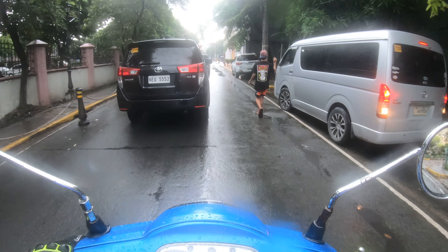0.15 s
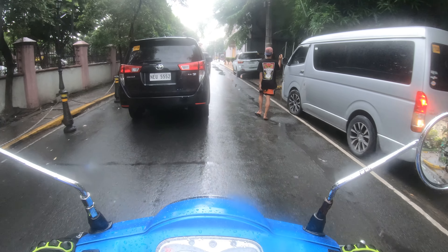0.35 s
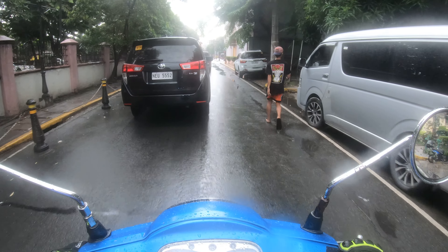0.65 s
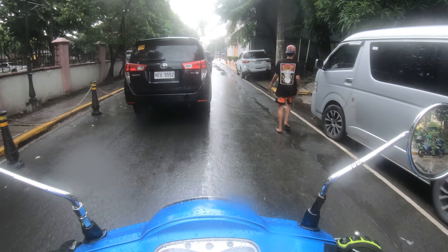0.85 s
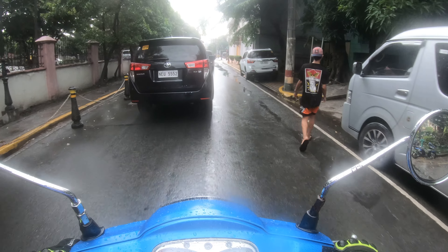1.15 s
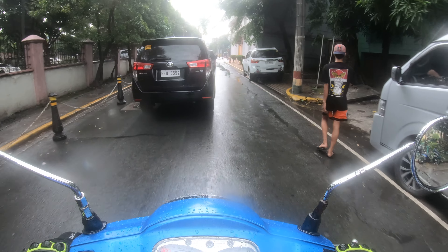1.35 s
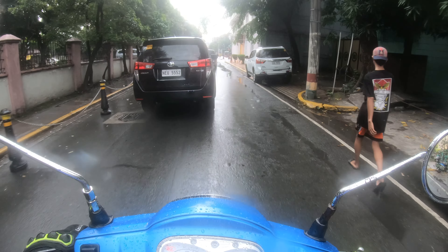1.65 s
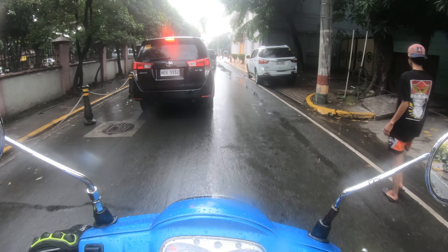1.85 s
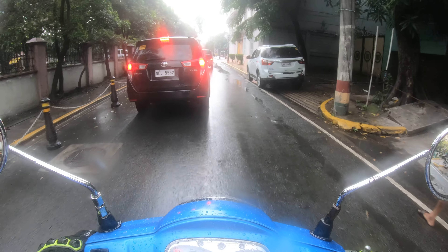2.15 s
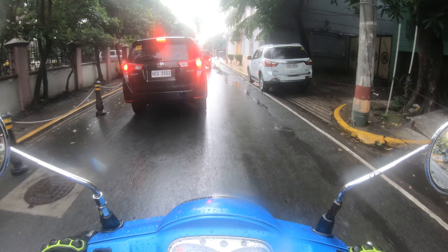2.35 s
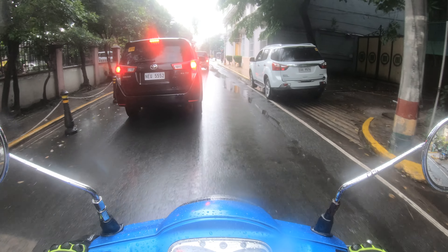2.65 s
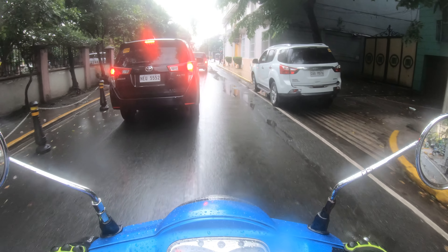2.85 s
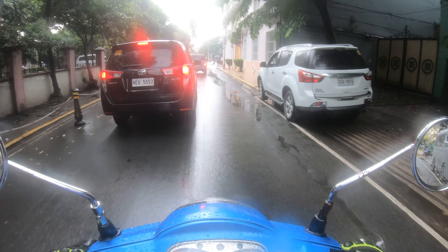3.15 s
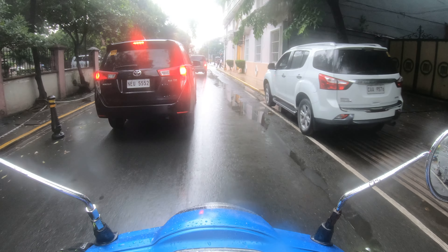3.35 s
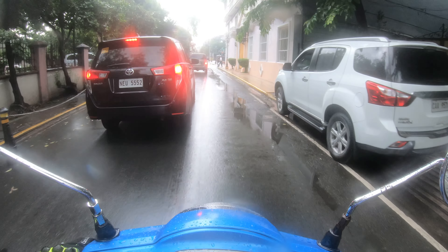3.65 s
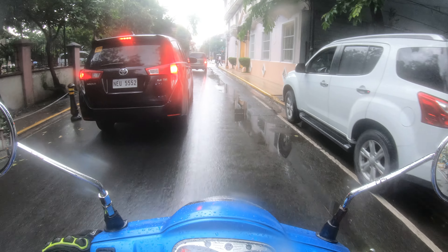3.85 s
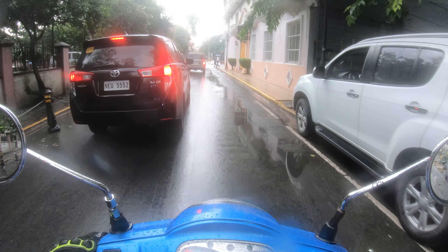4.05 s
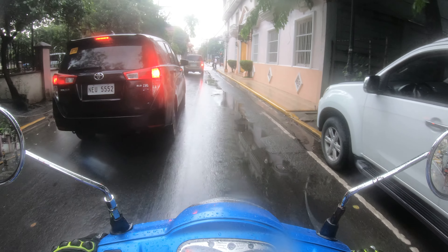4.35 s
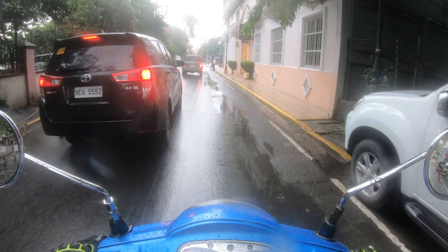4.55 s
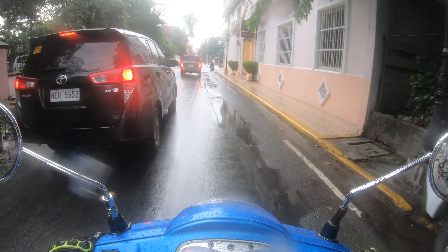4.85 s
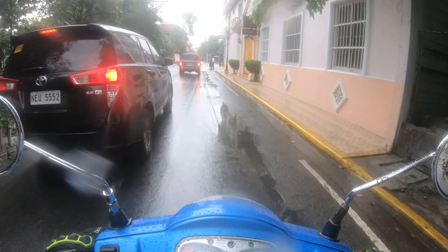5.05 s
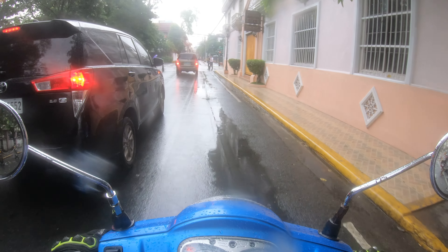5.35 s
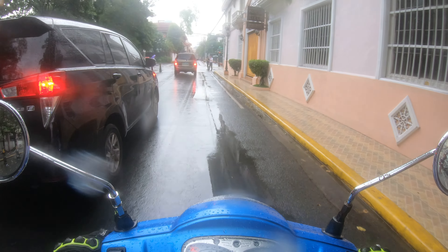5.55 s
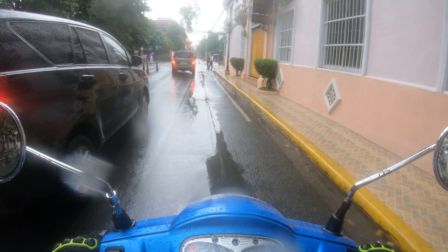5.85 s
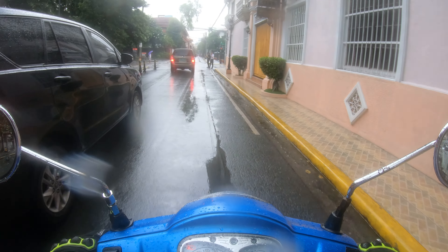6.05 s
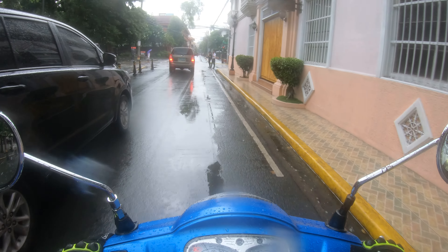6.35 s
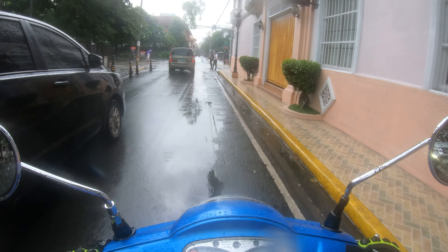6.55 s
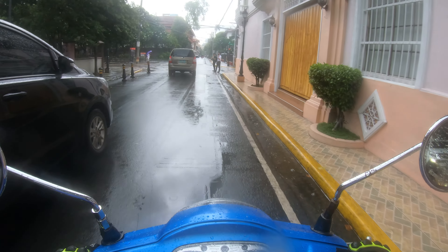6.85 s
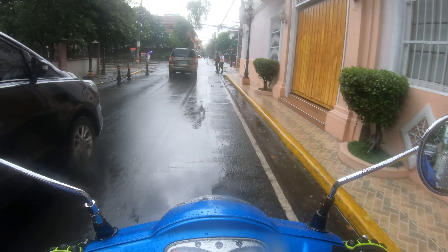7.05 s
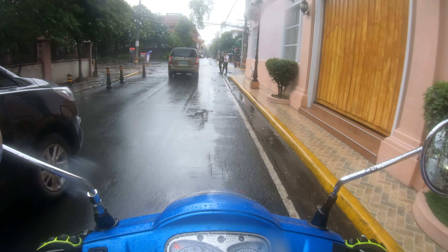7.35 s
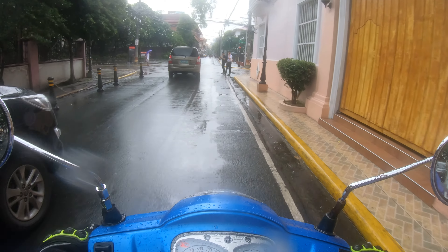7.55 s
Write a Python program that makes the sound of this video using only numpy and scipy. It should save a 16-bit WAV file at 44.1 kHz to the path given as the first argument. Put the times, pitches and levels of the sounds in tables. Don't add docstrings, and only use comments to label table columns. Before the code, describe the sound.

Outdoors on a rain-wet street, heard from inside a small case on the rider. Boxy, resonant spray hiss and fluttering low wind run throughout, with barely audible gear whines and small water ticks. The first half is fairly smooth; then the road roughens and hard clattering knocks arrive about three times a second, each a short body thud, crack and quick rebound, over strong closing gusts.

```python
import sys
import numpy as np
from scipy import signal
from scipy.fft import rfft, irfft, next_fast_len
from scipy.io import wavfile
from scipy.ndimage import uniform_filter1d

SR = 44100
rng = np.random.default_rng(int(sys.argv[2]) if len(sys.argv) > 2 else 0)


def field_ratio(decibels):
    return 10 ** (np.asarray(decibels, dtype=float) / 20)


def to_wav(sig):
    pcm = np.clip(np.atleast_2d(sig), -1, 1) * 32767
    pcm = np.round(pcm).astype(np.int16)
    wavfile.write(sys.argv[1], SR, pcm.T)


N = 339570
T = np.arange(N) / SR


def evened(x):
    return x / np.sqrt(np.mean(x ** 2) + 1e-20)


def read(points, hz):
    f, *columns = np.transpose(points)
    return [np.interp(np.log(hz + 1), np.log(f + 1), c) for c in columns]


def follow(rows, t):
    s, *columns = np.transpose(rows)
    return [np.interp(t, s, c) for c in columns]


def wander(smooth_s):
    size = int(smooth_s * 1000)
    drift = rng.standard_normal(7800)
    for _ in range(2):
        drift = uniform_filter1d(drift, size)
    return np.interp(T * 1000, np.arange(len(drift)), evened(drift))


def add(mix, s, sound):
    part = mix[round(s * SR):][:len(sound)]
    part += sound[:len(part)]


def ring(modes, spread, rise_s=0.00089):
    t = np.arange(3000) / SR
    hz, db, t60 = np.transpose(modes)[:, :, None]
    hz = hz * (1 + spread * rng.standard_normal(hz.shape))
    partials = field_ratio(db - 60 * t / t60) * np.sin(2 * np.pi * hz * t)
    sound = partials.sum(0) * (1 - np.exp(-t / rise_s))
    return sound / abs(sound).max()


def ports(x, table):
    size = next_fast_len(N + 4096)
    lead, tilt_db = read(table, np.fft.rfftfreq(size, 1 / SR))[-2:]
    spectrum = rfft(x, size)
    left = spectrum * field_ratio(tilt_db / 2)
    right = spectrum * field_ratio(-tilt_db / 2) * np.exp(1j * lead)
    return irfft([left, right], size)[:, :N]


# (frequency [Hz], likeness [0-1], right lead [rad], left over right [dB])
AIR_PORTS = [(29.5, 0.93, -3.5, 10), (86.5, 0.92, 0, 1), (173, 0.36, -1.5, 6.5), (236, 1, -2.5, -3),
             (423, 0.58, -1, -6.5), (556, 0.98, 1, -1), (839, 0.97, 3.5, -1.5), (1157, 1, 4, -1.5),
             (1420, 0.67, 4.5, -1.5), (2100, 0.7, 5, -6.5), (3260, 0.8, 4.5, -2.5), (4930, 1, 4, -11),
             (7140, 0.05, 3, -12.5), (15000, 0, 4, -9)]


def hiss(shape_db, size, patchy_db, flicker_db):
    hop = size // 4
    frames, hz = N // hop + 5, np.fft.rfftfreq(size, 1 / SR)[:, None]
    a, b, c, d, patches = rng.standard_normal((frames, len(hz), 5)).T
    patches = uniform_filter1d(patches, size=8, axis=0)
    patches = evened(uniform_filter1d(patches, size=10, axis=1))
    flicker = rng.standard_normal((frames, len(hz))).T
    flicker = evened(uniform_filter1d(flicker, size=160, axis=0))
    same, lead, tilt_db = read(AIR_PORTS, hz)
    same = np.clip(same, 0, 1)
    right = a + 1j * b
    left = same * right + np.sqrt(1 - same ** 2) * (c + 1j * d)
    left = left * field_ratio(tilt_db) * np.exp(-1j * lead)
    db = shape_db(np.arange(frames) * hop / SR, hz) + patchy_db * patches + flicker_db * flicker
    spectra = np.array([left, right]) * field_ratio(db) / np.sqrt(size)
    return signal.istft(spectra, nperseg=size, noverlap=size - hop)[1][:, :N]


# (start [s], length [s], level [dB], sway [Hz])
GUSTS = [(-.1, 0.45, -30, 28.9), (0.309, .18, -30.5, 29.3), (0.481, 0.21, -39.5, 27.1),
         (0.692, 0.19, -41.5, 25.1), (0.876, 0.12, -39, 26.98), (1.005, 0.23, -46.5, 28.7),
         (1.283, 0.12, -41.5, 26.2), (1.417, 0.2, -41, 24.9), (1.625, 0.46, -41, 25.2),
         (2.136, 0.28, -41.5, 25.51), (2.412, 0.13, -48, 24.8), (2.622, 0.29, -44, 23.76),
         (2.948, 0.28, -50, 24.14), (3.25, 0.22, -47, 23.57), (3.537, .14, -39, 23.55),
         (3.682, 0.24, -45.5, 23.8), (3.936, 0.21, -45, 23.57), (4.154, .13, -43, 23.6),
         (4.27, .3, -42.5, 23.63), (4.63, 0.25, -46, 23.3), (4.894, 0.17, -44, 23.7),
         (5.062, 0.36, -47, 23.8), (5.598, 0.28, -43, 22.03), (5.83, 0.21, -37.5, 22.76),
         (6.383, 0.47, -44, 22.2), (6.931, 0.24, -31.5, 24.83), (7.19, .11, -27, 25.04),
         (7.288, .1, -26, 24.1), (7.357, 0.22, -29.5, 22.2), (7.535, .3, -35.5, 21)]


def sway():
    edge_s, calm_db, flutter_db = 0.066, -56.5, 2.5
    start, length, level_db, gust_hz = np.transpose(GUSTS)[:, :, None]
    t = T[::100]
    edge = np.clip(np.minimum(t - start, start + length - t) / edge_s, 0, 1)
    push = field_ratio(level_db) * np.sin(np.pi / 2 * edge) ** 2 + 1e-9
    hz = np.interp(T, t, (push * gust_hz).sum(0) / push.sum(0))
    level = np.interp(T, t, push.sum(0)) * field_ratio(flutter_db * wander(0.026)) + field_ratio(calm_db)
    turns = np.cumsum(hz + 1.384 * wander(0.049)) / SR
    own_left, own_right = [1 + 0.12 * wander(0.05) for _ in "lr"]
    slip = 0.22 * wander(0.06)
    left = 0.77 * own_left * np.cos(2 * np.pi * turns + slip)
    right = own_right * np.cos(2 * np.pi * turns - slip)
    return level * field_ratio(4.0) * np.array([left, right])


# (time [s], roughness [dB], spray [dB])
ROAD = [(0.0, -49, -47.5), (0.34, -63, -47.5), (0.75, -69, -47), (1.2, -55.5, -45), (1.7, -56.5, -45),
        (2.1, -61, -44.5), (2.64, -43, -45), (2.9, -55, -43.5), (3.34, -43.5, -45), (3.88, -49.5, -47.5),
        (4.59, -46.5, -44.5), (4.78, -39.5, -43), (4.97, -45, -45.5), (5.7, -39, -46), (6.5, -41, -41.5),
        (7.06, -40.5, -43), (7.23, -40.5, -40.5), (7.7, -40, -41)]
# (frequency [Hz], level [dB])
RUMBLE_COLOUR = [(15, -22), (35, 0.5), (60, 6), (100, 2), (150, -7), (200, -7), (260, -10), (600, -52)]


def rumble():
    def shape_db(t, hz):
        return read(RUMBLE_COLOUR, hz)[0] + follow(ROAD, t)[0] + 20
    even = hiss(shape_db, size=2048, patchy_db=1.2, flicker_db=0.6)
    lumps_db = 1.5 * wander(0.046)
    return even * field_ratio(lumps_db)


# (frequency [Hz], level [dB])
SPRAY_COLOUR = [(100, -12), (250, -11), (480, -7.5), (650, -12), (1000, -3.5), (1400, -2.5), (2000, 0),
                (3000, -8), (3800, -12), (5000, -9.5), (7000, -20), (10000, -25), (11500, -33.5),
                (15000, -44.5)]
# (frequency [Hz], width [Hz], gain [dB])
CASE_HOLLOWS = [(776, 116, 9.5), (1025, 98, -3), (1314, 61, -27.5), (1442, 270, 1.5), (2127, 170, 5.5),
                (2570, 54, -7.5), (2633, 120, 7), (3160, 235, 0.5), (4510, 450, 4), (5430, 205, -3.5),
                (6500, 1200, 2.5), (9000, 3600, 4)]
# (time [s], length [s], gain [dB])
PUDDLES = [
    (1.501, 0.22, 1),
    (2.296, .3, 0.5),
    (3.678, .08, 1.5),
    (4.298, .3, 0.5),
    (5.9, 0.21, 0),
    (6.554, 0.18, -0.5),
    (6.782, 0.12, 1.5),
    (7.45, 0.18, 1.5),
]


def spray():
    dull_db, brighter_per_s = -1.5, 0.18

    def shape_db(t, hz):
        hollows_db = sum(db / (1 + (2 * (hz - f) / w) ** 2) for f, w, db in CASE_HOLLOWS)
        puddles_db = sum(db * np.exp(-(2 * (t - s) / length) ** 2) for s, length, db in PUDDLES)
        level_db = follow(ROAD, t)[1] + puddles_db + 18
        tilt_db = (dull_db + brighter_per_s * t) * np.log2((hz + 200) / 2200)
        return read(SPRAY_COLOUR, hz)[0] + hollows_db + level_db + tilt_db
    return hiss(shape_db, size=1024, patchy_db=0.98, flicker_db=0.9)


# (start [s], end [s], first pitch [Hz], last pitch [Hz], top level [dB])
WHINES = [(1.5, 2.65, 805, 880, -55), (3.15, 3.55, 855, 795, -61), (4.6, 7.9, 795, 812, -62),
          (1.25, 1.75, 1170, 1230, -57), (2.6, 3.45, 1195, 1228, -56), (4.25, 4.95, 1152, 1188, -58),
          (4.9, 5.7, 1188, 1228, -57), (2.2, 3.45, 295, 295, -62), (-.1, 1, 146, 147, -60),
          (1.7, 3.45, 475, 485, -63), (-.2, 1.3, 2085, 2090, -60), (5.65, 6.15, 45, 43, -40),
          (5.7, 6.6, 1205, 1235, -60), (2.05, 2.95, 2110, 2110, -57)]


def whines():
    out = np.zeros(N)
    for start, end, from_hz, to_hz, top_db in WHINES:
        u = (T - start) / (end - start)
        on = (u > 0) & (u < 1)
        hz = from_hz + (to_hz - from_hz) * u[on] + 2.18 * wander(0.04)[on]
        turns = np.cumsum(hz) / SR
        level_db = top_db - 8 * (2 * u[on] - 1) ** 2
        level_db = level_db + 1.5 + 3 * wander(0.04)[on]
        out[on] += field_ratio(level_db) * np.sin(2 * np.pi * turns)
    return ports(out, AIR_PORTS)


def buffet():
    centre_hz, wide_hz, start_db, grows_db_per_s = 39, 13, -22, 0.6

    def shape_db(t, hz):
        return start_db + grows_db_per_s * t - 12 * ((hz - centre_hz) / wide_hz) ** 2
    return hiss(shape_db, size=4096, patchy_db=1.5, flicker_db=1.0)[1]


# (time [s], peak level [dB], pitch [Hz], t60 [s])
DROPS = [(.278, -40, 2070, 0.013), (0.423, -33, 2100, 0.017), (0.546, -35.5, 2260, 0.02),
         (1.039, -37, 168, 0.13), (1.13, -27.5, 2320, 0.026), (1.634, -30.5, 2169, 0.011),
         (2.7, -32, 2200, 0.012), (3.247, -32.5, 2100, 0.015), (5.417, -33.5, 1636, 0.018),
         (5.816, -37, 1162, 0.0182), (6.4737, -28.5, 8860, 0.0038), (6.4734, -46, 12000, 0.00276),
         (6.4737, -33, 3610, .004), (6.4737, -36, 5600, .004), (7.69, -42, 9000, 0.0085),
         (7.69, -49.5, 13220, 0.0068), (6.472, -35, 2068, .01), (6.521, -28, 1910, 0.024),
         (7.295, -34, 6500, 0.0092), (7.296, -42, 4600, 0.0039), (7.437, -27.5, 2170, 0.032),
         (7.437, -33, 4930, 0.009)]


def drops():
    out = np.zeros(N)
    for s, db, hz, t60 in DROPS:
        cluster = [(hz * 0.88, -3, t60), (hz, 0, t60), (hz * 1.15, -2, t60)]
        add(out, s, field_ratio(db) * ring(cluster, spread=0.02, rise_s=1.5 / hz))
    return ports(out, AIR_PORTS)


# (frequency [Hz], right lead [rad], left over right [dB])
SHELL_PORTS = [(40, 0, 0), (92, -.9, -1), (148, -2.1, 0), (275, -3.1, 0), (325, -3.3, -2), (365, -4.3, -8),
               (410, -4.6, 4), (480, -3.7, -2), (760, -3.9, -2), (900, -3.1, 0), (1100, -2.2, -1),
               (2100, -1, -4), (5000, -3, -11), (15000, -.6, -7)]
# (frequency [Hz], level [dB], t60 [s])
BODY = [(240, -14.5, 0.023), (295, -5, 0.058), (340, -6.5, 0.047), (408, -8.5, 0.044), (526.5, 2.5, 0.014),
        (626, -2, 0.019), (712, -4.5, 0.028), (758, -11, 0.047), (965, -6, 0.044), (1012, -15, 0.04)]
# (frequency [Hz], level [dB], t60 [s])
PLATE = [(1250, -14, .01), (1500, -5, .016), (1660, -7, .01), (1790, -5, .012), (1930, -2, .017),
         (2080, -3, .009), (2270, -2, .013), (2480, -7, .007), (2780, -13, .007)]
# (frequency [Hz], level [dB], t60 [s])
CLICK = [(4600, -3.5, 0.015), (5800, 1.5, 0.0082), (6500, -4, 0.011), (8800, -5, 0.0069),
         (12500, -24, 0.0021)]
# (time [s], body level [dB], arm level [dB], seat level [dB], hardness [dB per octave])
BLOWS = [
    (4.7472, -15.5, -25.5, -24, 12),
    (5.385, -23.5, -44, -39, 6),
    (5.5725, -9, -23.5, -22.5, 3.5),
    (5.945, -7, -20.5, -23, -1),
    (6.2741, -10, -22.5, -22.5, -3),
    (6.6825, -14, -29, -29, -10),
    (7.0024, -7.5, -19, -28, -1),
    (7.3141, -11, -20, -28, -0.5),
    (7.687, -12, -40, -22, -0.5),
]
# (time [s], plate level [dB], click level [dB], body level [dB], sharpness [dB per octave])
CRACKS = [(4.7488, -16.5, -34, -39, 7), (4.758, -28.5, -45.5, -19.5, -2), (4.767, -38, -50, -30, 0),
          (5.385, -37, -46, -30, -9), (5.575, -22, -35.5, -44, 1), (5.585, -19, -46.5, -15.5, -21),
          (5.948, -18.5, -27.5, -45, -4), (5.961, -21, -44, -17, -15), (6.277, -18, -27.5, -27, -9),
          (6.289, -26, -43.5, -14.5, -5), (6.683, -8, -24, -12.5, -6), (7.006, -19.5, -32, -39, 0),
          (7.023, -20, -44, -19.5, -14), (7.318, -23.5, -32, -20, -2), (7.332, -42, -42, -20.5, 0),
          (7.69, -20.5, -32, -33.5, 0)]


def knocks():
    arm_hz, seat_hz, seat_lag_s = 146.4, 93.6, 0.023
    out, t = np.zeros(N), np.arange(4000) / SR
    pad = signal.windows.hann(18)
    pad = pad / pad.sum()
    held = np.exp(-t / 0.081 - (t / 0.0445) ** 4)
    late = np.exp(-((t - seat_lag_s) / 0.018) ** 2)
    for s, body_db, arm_db, seat_db, hard_db in BLOWS:
        body = [(hz, db + hard_db * np.log2(hz / 500), t60) for hz, db, t60 in BODY]
        arm = held * np.sin(2 * np.pi * arm_hz * rng.uniform(1.0, 1.02) * t)
        seat = late * np.sin(2 * np.pi * seat_hz * rng.uniform(0.92, 1.03) * t)
        add(out, s, field_ratio(body_db) * np.convolve(ring(body, spread=0.015), pad))
        add(out, s, -field_ratio(arm_db) * arm)
        add(out, s, field_ratio(seat_db) * seat)
    for s, plate_db, click_db, body_db, sharp_db in CRACKS:
        plate = [(hz, db + sharp_db * np.log2(hz / 1930), t60) for hz, db, t60 in PLATE]
        add(out, s, field_ratio(plate_db) * ring(plate, spread=0.02, rise_s=0.0006))
        add(out, s, field_ratio(click_db) * ring(CLICK, spread=0.04, rise_s=0.00005))
        add(out, s, -field_ratio(body_db) * np.convolve(ring(BODY, spread=0.03), pad))
    return ports(out, SHELL_PORTS)


def scene():
    return sway() + rumble() + spray() + whines() + buffet() + drops() + knocks()


def low_pass(x):
    return signal.sosfilt(signal.butter(12, 15280, fs=SR, output="sos"), x)


def record(dry):
    edge = signal.firwin(255, 14900, fs=SR)
    mix = signal.oaconvolve(dry, edge[None], "same")
    return low_pass(mix)


dry = scene()
out = record(dry)
to_wav(out)
```